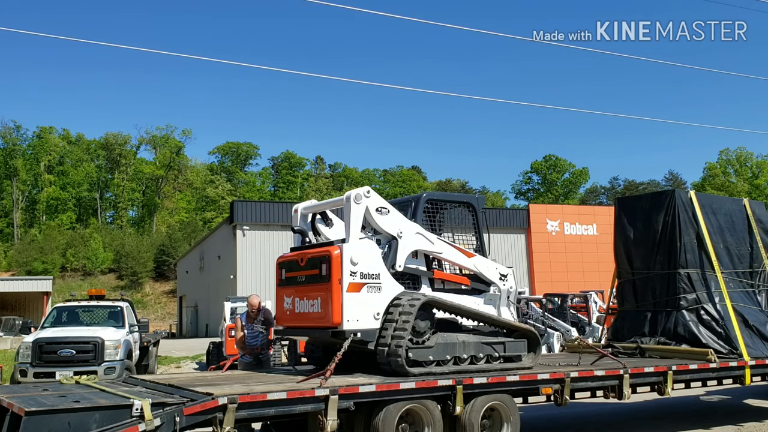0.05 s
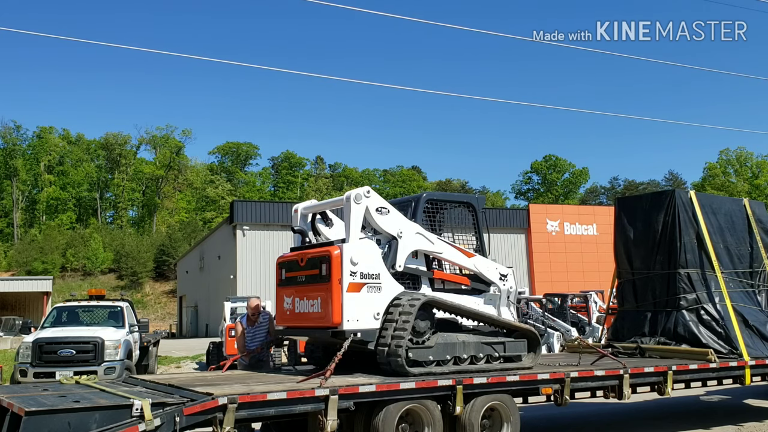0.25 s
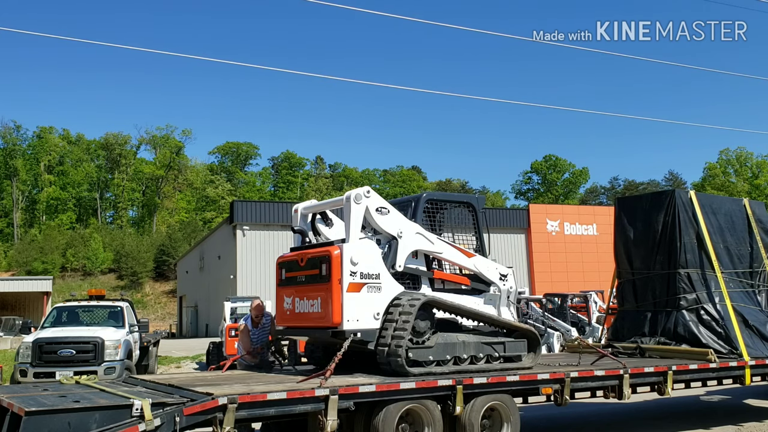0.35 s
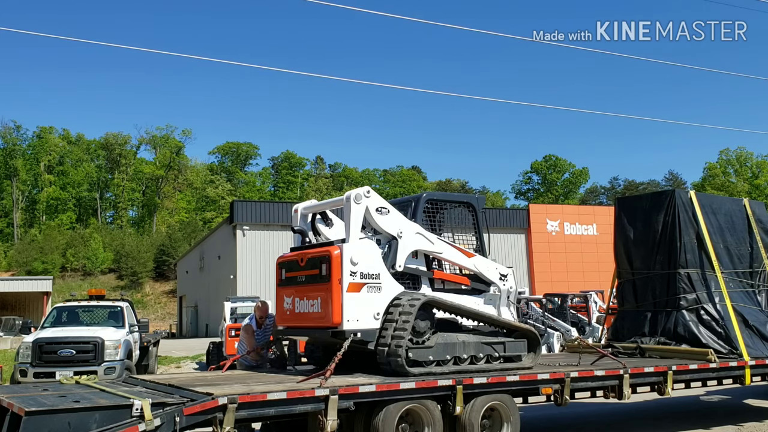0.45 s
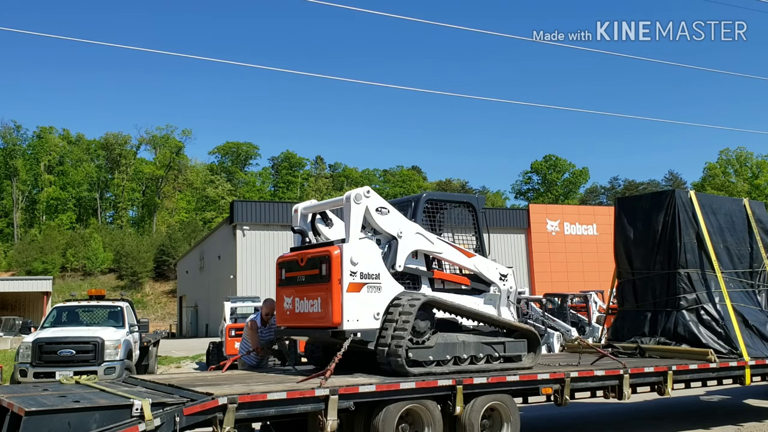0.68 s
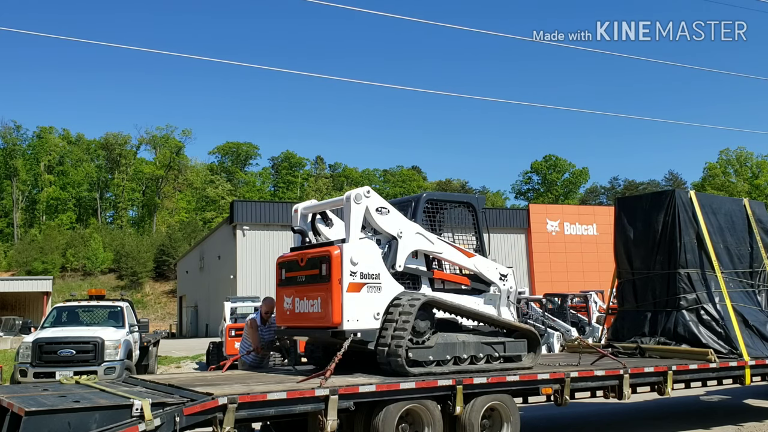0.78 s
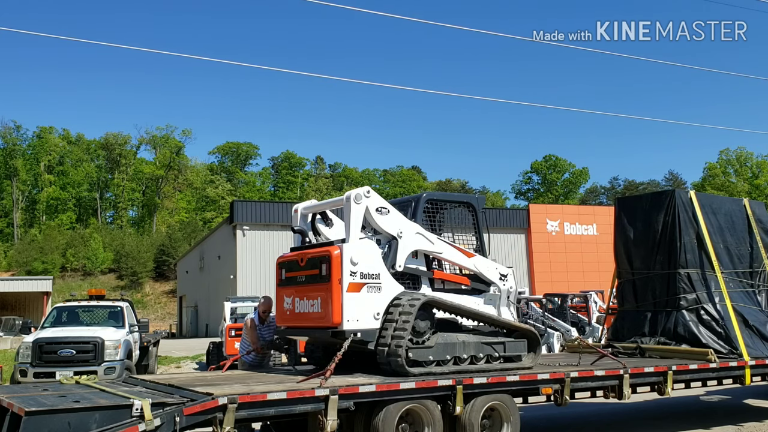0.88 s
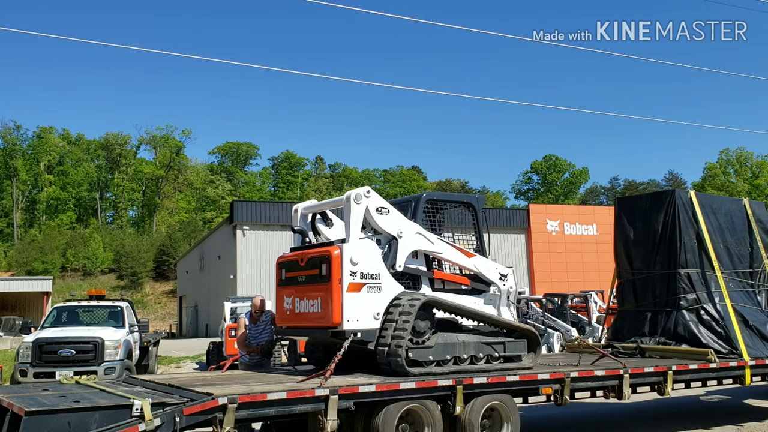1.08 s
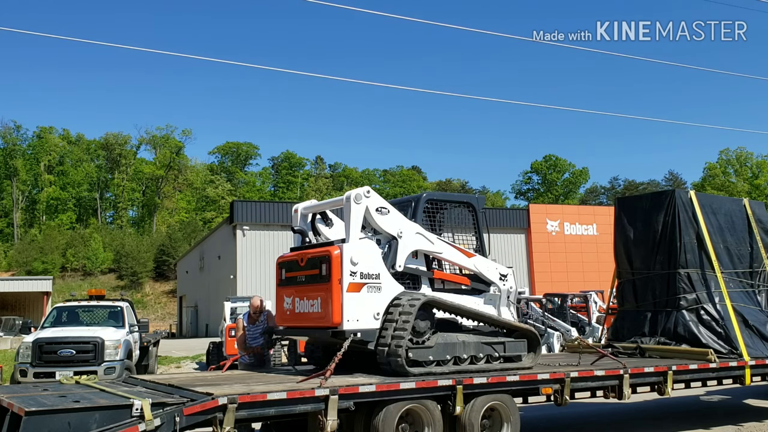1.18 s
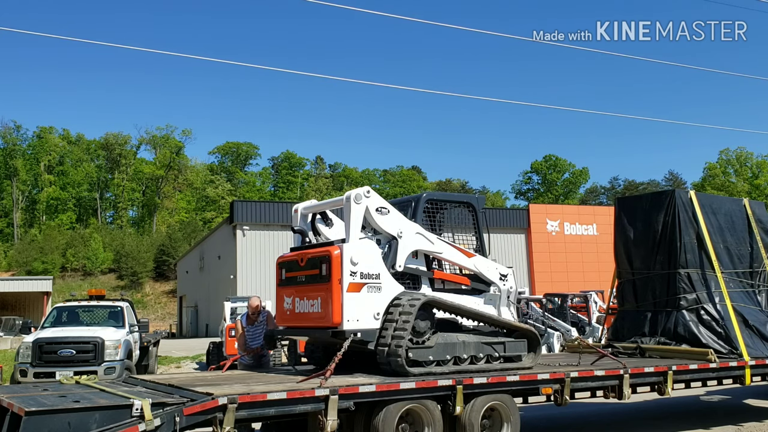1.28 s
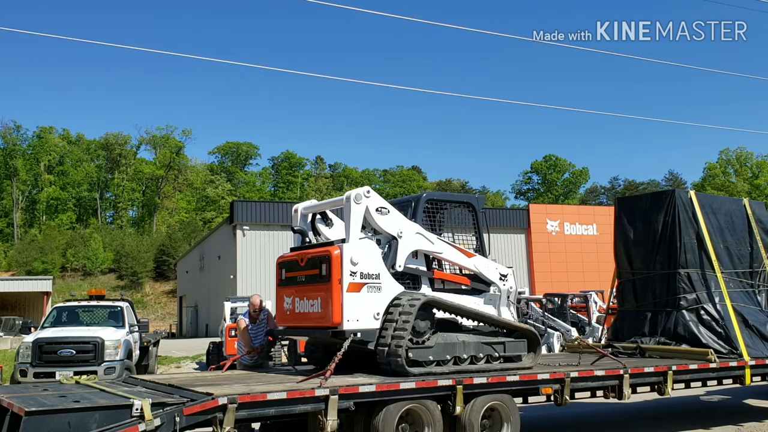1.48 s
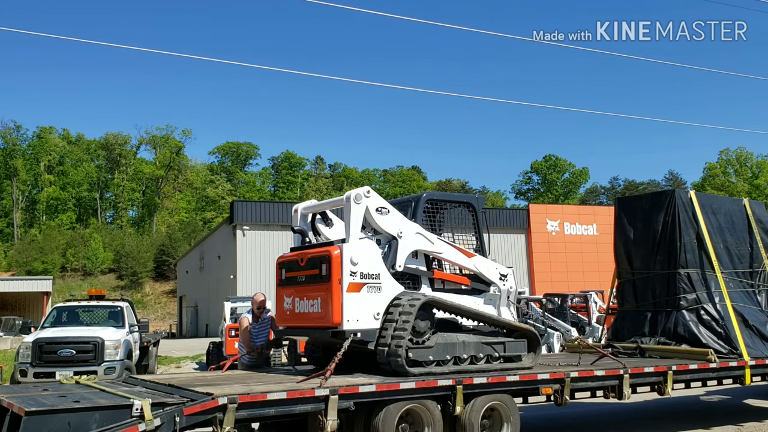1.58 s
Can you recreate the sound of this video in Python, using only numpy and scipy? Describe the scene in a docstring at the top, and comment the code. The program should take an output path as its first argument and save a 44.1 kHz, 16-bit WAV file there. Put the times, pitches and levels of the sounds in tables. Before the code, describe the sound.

A steel chain clinks faintly, then drops on a flatbed trailer with a clank and a bright rattle. It slides on with light clinks and knocks, then jingles again, over a faint outdoor rumble and a distant idling engine.

```python
"""Faint clinks over a low outdoor rumble, then a clank: a steel tie-down chain drops on a flatbed trailer.
The impact excites the modes of the deck and the hook. The chain slides on link by link, each contact a
dry click with a very high ring; it chafes, knocks on the boards and the rail, and rings the binder.
Behind it, in the open yard, the low tones of a distant idling engine beat against each other."""
import sys
import numpy as np
from scipy import signal
from scipy.fft import rfft, irfft, next_fast_len
from scipy.io import wavfile
from scipy.ndimage import map_coordinates

SR = 44100
rng = np.random.default_rng(int(sys.argv[2]) if len(sys.argv) > 2 else 0)


def put_to_file(sound):
    """Save the sound as 16-bit audio at rate SR, in the file named by the first command-line argument."""
    columns = np.atleast_2d(sound).T  # one column per channel
    safe = np.clip(columns, -1, 1)
    whole_steps = np.round(safe * 32767)
    wavfile.write(sys.argv[1], SR, whole_steps.astype(np.int16))


N = 72765
RING_TIME = np.arange(int(0.3 * SR)) / SR  # time axis of one impact [s]
SIDES = np.array([[1], [-1]])  # plus on the left, minus on the right


def amp(db):
    """Decibels as an amplitude ratio."""
    return 10 ** (np.asarray(db) / 20)


def unit(x):
    """Normalisation to rms 1."""
    return x / np.sqrt(np.mean(x ** 2, axis=-1, keepdims=True) + 1e-20)


def along(points, hz):
    """Interpolation of (frequency, value) points on a logarithmic frequency axis."""
    f, v = np.transpose(points)
    return np.interp(np.log(hz + 1), np.log(f + 1), v)


def filtered(x, response):
    """Linear filtering: the spectrum is multiplied by a frequency response."""
    n = x.shape[-1]
    padded = next_fast_len(n + 2048)
    return irfft(rfft(x, padded) * response(np.fft.rfftfreq(padded, 1 / SR)), padded)[..., :n]


def from_left(x, lead_s):
    """Interaural time difference: the left side leads the right."""
    return filtered(x, lambda hz: np.exp(1j * np.pi * hz * lead_s * SIDES))


def noise(spectrum, size):
    """Spectral shaping gives two independent coloured noises of rms 1."""
    gain = amp(along(spectrum, np.fft.rfftfreq(size, 1 / SR)))
    return unit(irfft(rfft(rng.standard_normal((2, size))) * gain, size))


def rise(t, attack_s):
    """Exponential approach to full amplitude."""
    return 1 - np.exp(-t / attack_s)


def fade(t, t60):
    """Exponential decay, 60 dB in t60 seconds."""
    return np.exp(-np.log(1000) * t / t60)


def die_away(t, t60, tail_db, tail_t60):
    """Double-slope decay: the direct sound and the yard's slower answer add in energy."""
    return np.hypot(fade(t, t60), amp(tail_db) * fade(t, tail_t60))


def modes(table, t, width, detune=0.007):
    """Superposition of damped modes, varied at each strike; width scatters phase between the sides."""
    out = 0
    for hz, db, t60 in table:
        phase = rng.uniform(0, 2 * np.pi) + width * rng.standard_normal((2, 1))
        strength = amp(db + rng.uniform(-3, 3))
        pitch = hz * (1 + detune * rng.standard_normal())
        out = out + strength * fade(t, t60) * np.sin(2 * np.pi * pitch * t + phase)
    return out / np.sqrt(sum(amp(db) ** 2 for _, db, _ in table) / 2)


def add(out, start_s, sound):
    """Superposition of a sound on the mix from start_s onward."""
    part = out[:, max(0, round(start_s * SR)):][:, :sound.shape[1]]
    part += sound[:, :part.shape[1]]


# spectrum of the rumble (frequency [Hz], relative level [dB])
RUMBLE_SPECTRUM = [(20, 1), (45, -0.1), (70, 2.5), (130, 2), (190, 1), (290, -3.5), (450, -5.5),
                   (700, -11.5), (1000, -14), (1700, -23.5), (3000, -41.5), (7000, -43.5), (10000, -54),
                   (15000, -56)]
# likeness of left and right (frequency [Hz], coherence [0-1])
RUMBLE_COHERENCE = [(60, 0.96), (240, 0.7), (500, 1), (950, 0.74), (15000, 0)]
# envelope of the rumble (time [s], level [dB])
RUMBLE_LEVEL = [(0, -55), (.35, -55), (1.0, -54.5), (1.4, -52.5), (1.65, -55.5)]
def rumble():
    """Wind and far machinery form a partly coherent noise field, nearly mono in the bass."""
    def mid_side_gains(hz):
        angle = np.arccos(np.clip(along(RUMBLE_COHERENCE, hz), -1, 1)) / 2
        return np.array([np.cos(angle), np.sin(angle)])
    mid, side = filtered(noise(RUMBLE_SPECTRUM, N), mid_side_gains)
    level_db = np.interp(np.arange(N) / SR, *np.transpose(RUMBLE_LEVEL))
    return amp(level_db) * unit(mid + SIDES * side)


# tones of the idling engine (frequency [Hz], level [dB])
ENGINE_TONES = [(73.8, -57), (84.6, -55), (191.6, -55)]
def engine(sway_hz=1.22, sways_per_s=9, throb_at_s=0.16, pan_db=0.7):
    """Beating: the engine's tones wander together, and the two lowest interfere in an even throb."""
    t = np.arange(N) / SR
    sway = map_coordinates(rng.standard_normal(64), [t * sways_per_s], mode="mirror")  # smooth and random
    drift = np.cumsum(sway_hz * sway) / SR + rng.random()  # cycles
    hum = sum(amp(db) * np.sin(2 * np.pi * (hz * (t - throb_at_s) + drift)) for hz, db in ENGINE_TONES)
    return np.sqrt(2) * hum * amp(pan_db * SIDES)


# knocks of the chain on the boards (time [s], level [dB])
BOARD_KNOCKS = [(.596, -49.5), (.607, -50), (.619, -52.5), (0.629, -65), (0.994, -62.5)]
# response of the wood (frequency [Hz], relative level [dB])
BOARD_SPECTRUM = [(200, -24), (400, 1.5), (700, -2), (870, 3.5), (1150, -4), (1300, -12), (1800, -5.5),
                  (2300, -15), (3600, -26), (6000, -42)]
def boards(width=0.92):
    """Heavy damping broadens resonances: the wooden boards answer a knock with a short clunk."""
    out, t = np.zeros((2, N)), RING_TIME
    envelope = die_away(t, t60=0.047, tail_db=-5.5, tail_t60=0.18) * rise(t, 0.00089)
    for start, db in BOARD_KNOCKS:
        mid, side = noise(BOARD_SPECTRUM, len(t))
        add(out, start, amp(db) * envelope * (mid + width * SIDES * side))
    return out


# strikes on the hook, the binder and the side rail (time [s], level [dB])
HOOK_STRIKES = [(.285, -38.5), (.313, -37.5), (.327, -40), (.438, -61.5), (.453, -54)]
BINDER_STRIKES = [(1.25, -66), (1.295, -62), (1.362, -58), (1.374, -52), (1.390, -53), (1.403, -56)]
RAIL_STRIKES = [(1.096, -57), (1.108, -62)]
# their modes (frequency [Hz], relative level [dB])
HOOK_MODES = [(2430, -3), (2772, -2.5), (2934, -3.5), (3070, -13), (3311, -5), (3490, -10), (3790, -1.5),
              (3870, -4.5), (4118, -18), (4296, -4.5), (4646, -6.5), (4840, -16.5), (7520, -1.5)]
BINDER_MODES = [(2075, 3.5), (2584, -1), (2900, -13), (3332, -7), (3650, -4), (4097, 4.5), (4425, -6),
                (4880, 3), (6595, 4), (6850, -18), (7270, 8.5), (7600, 1), (8484, 3)]
RAIL_MODES = [(581, 6), (861, -6), (1950, -6), (2010, -8), (2420, -3)]
def hardware(hook_t60=0.11, binder_t60=0.115, rail_t60=0.065, pan_db=1.3):
    """Free vibration: struck by the chain, hook, binder and rail ring at their natural frequencies."""
    out, t = np.zeros((2, N)), RING_TIME
    for strikes, table, t60 in ((HOOK_STRIKES, HOOK_MODES, hook_t60),
                                (BINDER_STRIKES, BINDER_MODES, binder_t60),
                                (RAIL_STRIKES, RAIL_MODES, rail_t60)):
        damped = [(hz, level, t60) for hz, level in table]
        for start, db in strikes:
            add(out, start, amp(db) * modes(damped, t, width=1.97) * rise(t, 0.00095))
    return out * amp(pan_db * SIDES)


# the chain landing on the deck (time [s], thud level [dB], clang level [dB])
DECK_BLOWS = [(0.2806, -28.5, -32), (.286, -31, -21.5), (.302, -39.5, -35.5), (.322, -35, -37.5),
              (.338, -47, -40.5), (.385, -40, -41.5), (0.413, -43, -61.5), (.440, -45, -51),
              (1.383, -69, -58.5), (1.406, -57, -57)]
# modes of the deck's body and steel edge (frequency [Hz], relative level [dB], T60 [s])
BODY_MODES = [(195.3, -3.5, 0.097), (252, 4.5, 0.07), (288.5, 3, 0.13), (324.5, 3.5, 0.18), (393, -8, 0.31),
              (450, -7.5, 0.21)]
EDGE_MODES = [(575, -12, 0.22), (608.4, -6.5, 0.29), (676, -4, 0.2), (790, -13.5, 0.25), (867, 4.5, 0.11),
              (939, 7, 0.056), (1006, -2.5, 0.11), (1183, 3.5, 0.04), (1525, -1, 0.059)]
# noise of a blow in body and edge (frequency [Hz], relative level [dB])
THUD_SPECTRUM = [(60, -28), (150, 12.5), (270, 19), (450, 4), (800, -24), (2000, -40.5)]
CLANG_SPECTRUM = [(200, -15), (550, -1), (750, -1.5), (920, -5), (1150, -9), (1550, -9), (1900, -14),
                  (4000, -41), (9000, -64.5)]
def deck(modes_db=-1, thud_width=0.22, clang_width=0.44):
    """Impact excitation: the chain's weight sets off a thud in the deck and a clang in its steel edge."""
    out, t = np.zeros((2, N)), RING_TIME
    envelope = die_away(t, t60=0.024, tail_db=-16.5, tail_t60=0.44)
    for start, thud_db, clang_db in DECK_BLOWS:
        for table, spectrum, db, width in ((BODY_MODES, THUD_SPECTRUM, thud_db, thud_width),
                                           (EDGE_MODES, CLANG_SPECTRUM, clang_db, clang_width)):
            mid, side = noise(spectrum, len(t))
            burst = (mid + width * SIDES * side) * envelope
            ring = amp(modes_db) * modes(table, t, width)
            add(out, start, amp(db) * (burst + ring) * rise(t, 0.0017))
    return from_left(out, lead_s=0.00019)


# links rubbing together (time [s], duration [s], level [dB])
LINK_CHAFES = [(0.105, .014, -58), (.236, .016, -50), (1.367, 0.035, -49)]
# rasp of one slip (frequency [Hz], relative level [dB])
SLIP_SPECTRUM = [(5500, -31), (7200, -5), (9300, -8.5), (12000, 3), (15500, -12)]
def chafing(slips_per_s=1500, pan_db=0.8):
    """Stick-slip friction: taut links catch and release in a quick run of tiny bright ticks."""
    out, t = np.zeros((2, N)), RING_TIME
    for start, duration, db in LINK_CHAFES:
        slips = (rng.random(N) < slips_per_s / SR) * rng.exponential(1, N)
        train = unit(slips[:int(duration * SR)])
        tick = noise(SLIP_SPECTRUM, len(t)) * fade(t, t60=0.014)
        tick /= np.linalg.norm(tick[0])
        add(out, start, amp(db) * signal.fftconvolve(tick, train[None], axes=1))
    return out * amp(pan_db * SIDES)


# a link's resonances, the hiss around them and its radiating band (frequency [Hz], relative level [dB])
LINK_RESONANCES = [(13790, -5.5), (14480, -5.5), (15330, -10.5)]
HISS_SPECTRUM = [(9000, -26.5), (12000, 6), (13000, 0.5), (14500, -12.5), (15700, -4), (16500, -27.5)]
RADIATING_BAND = [(9000, -36), (12500, -28), (13200, 2), (13600, -1.5), (15450, -2), (15800, -16.5)]
def link_ring(t, spread_hz=71, detune_hz=40, hiss_db=-10):
    """Modal overlap: neighbouring links ring at slightly different pitches, merging into narrow bands."""
    hz = np.fft.rfftfreq(len(t), 1 / SR)
    bands = 0
    for centre, db in LINK_RESONANCES:
        offset_hz = hz - centre - rng.normal(0, detune_hz)
        bands = bands + amp(db) / (1 + np.abs(offset_hz / spread_hz) ** 3.17 / 2)
    band_noise = irfft(rfft(rng.standard_normal((2, len(t)))) * bands, len(t))
    envelope = die_away(t, t60=0.081, tail_db=-20, tail_t60=0.19)
    ring = unit(band_noise * envelope) * np.sqrt(np.mean(envelope ** 2))
    hiss = amp(hiss_db) * noise(HISS_SPECTRUM, len(t)) * fade(t, t60=0.12)
    return filtered((ring + hiss) * rise(t, 0.0018), lambda f: amp(along(RADIATING_BAND, f)))


# click of link on link (frequency [Hz], relative level [dB])
CLICK_SPECTRUM = [(300, -0.5), (1400, -3.5), (2000, 6), (2600, -3), (3600, 3.5), (5400, -4.5), (7500, -1.5),
                  (9200, -7.5), (11500, 3), (14000, -8), (15500, 12.5), (16100, -34.5)]
def link_click(t, partial_band_hz=(2470, 8404), partial_db=-12.5, partial_t60=0.094):
    """A brief force has a broad spectrum: a dry click, with a few weak partials of the link."""
    partials = [(hz, 0, partial_t60) for hz in rng.uniform(*partial_band_hz, size=12)]
    burst = noise(CLICK_SPECTRUM, len(t)) * die_away(t, t60=0.024, tail_db=-9.5, tail_t60=0.2)
    return (burst + amp(partial_db) * modes(partials, t, width=1)) * rise(t, 0.00061)


def contact(ring_db, click_db, ring_pan_db=4, click_pan_db=0.8):
    """A collision of two links radiates a ring and a click, both louder on the left."""
    ring = amp(ring_db + ring_pan_db * SIDES) * link_ring(RING_TIME)
    click = amp(click_db + click_pan_db * SIDES) * link_click(RING_TIME)
    return ring + click


# single link contacts (time [s], ring level [dB], click level [dB])
CHAIN_CLINKS = [(0.058, -67, -66.5), (0.088, -57.5, -61.5), (0.11, -50, -51), (0.15, -53, -75),
                (.231, -36, -65.5), (.236, -28, -60), (0.24, -28, -55), (0.248, -56, -60),
                (.281, -18.5, -37.5), (0.287, -19.5, -34.5), (.298, -15.5, -36), (0.309, -17.5, -29),
                (0.327, -24.5, -40), (0.34, -23.5, -55), (.355, -19, -41.5), (0.376, -27, -48),
                (0.394, -29, -50), (0.404, -22.5, -50), (0.413, -24.5, -46), (.437, -31, -46.5),
                (.452, -38, -70), (0.469, -31, -60), (0.486, -21.5, -56.5), (.503, -29, -54),
                (0.529, -42, -73), (0.595, -57, -67), (0.623, -48, -98), (0.638, -49, -86.5),
                (0.686, -53, -54.5), (0.694, -46, -60), (0.705, -45, -55), (0.731, -63, -69),
                (.755, -42, -56), (0.761, -48, -69), (0.819, -55, -65.5), (0.837, -63.5, -77),
                (0.881, -64, -77), (.918, -55.5, -76.5), (0.937, -54, -66), (1.097, -84, -62.5),
                (1.133, -71.5, -61.5), (1.215, -63.5, -67), (1.246, -53.5, -56), (1.287, -55, -56),
                (1.311, -47, -72), (1.329, -45.5, -53), (1.345, -54, -60), (1.368, -33, -51.5),
                (1.385, -29.5, -48), (1.388, -35, -54.5), (1.399, -36, -62), (1.426, -48, -74),
                (1.456, -52.5, -99), (1.525, -65, -94), (1.57, -43, -67), (1.586, -48, -73)]
# the chain sliding over steel (time [s], duration [s], ring level [dB], click level [dB])
CHAIN_SLIDES = [(0.102, 0.12, -75, -69), (0.286, 0.05, -28, -42), (0.433, 0.028, -60, -48.5),
                (0.601, 0.058, -64, -75), (0.692, 0.06, -66, -69.5), (1.25, 0.18, -70, -70),
                (1.358, 0.035, -39, -57)]
def chain(contacts_per_s=450, weakest_db=-7, range_db=8):
    """Impulse response: a clink is one contact, a slide is a contact convolved with an uneven train."""
    out = np.zeros((2, N))
    for start, ring_db, click_db in CHAIN_CLINKS:
        add(out, start, contact(ring_db, click_db))
    for start, duration, ring_db, click_db in CHAIN_SLIDES:
        jitter, force = rng.random((200, 2)).T
        times = (np.arange(len(jitter)) + jitter) / contacts_per_s
        strengths = amp(weakest_db + range_db * force)
        train = np.bincount((times * SR).astype(int), strengths)[:int(duration * SR)]
        add(out, start, signal.fftconvolve(contact(ring_db, click_db), train[None], axes=1))
    return out


def scene():
    """Superposition: chain and trailer sound over the yard's background, which arrives from the left."""
    background = from_left(engine() + rumble(), lead_s=0.00037)
    return background + chain() + chafing() + hardware() + deck() + boards()


def record(dry, cutoff_hz=16300):
    """Band limiting: an ideal low-pass filter removes everything above the cutoff."""
    return filtered(dry, lambda hz: hz < cutoff_hz)


dry = scene()
out = record(dry)
put_to_file(out)
```